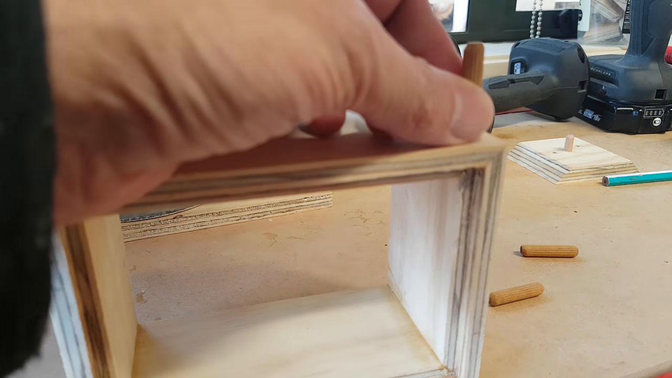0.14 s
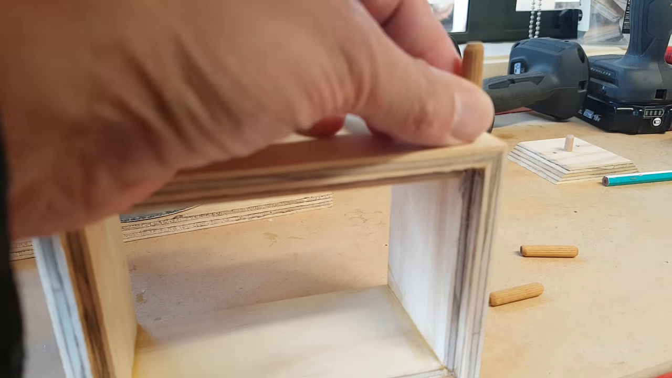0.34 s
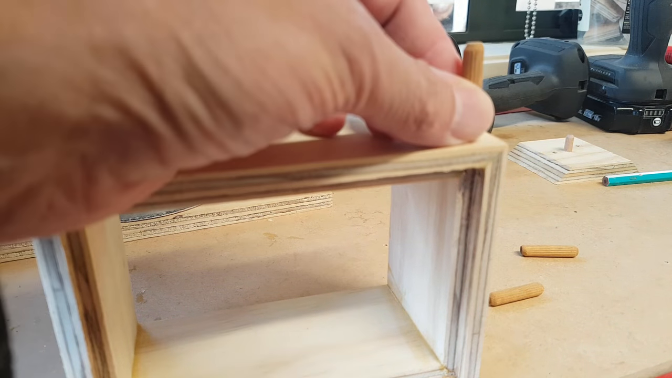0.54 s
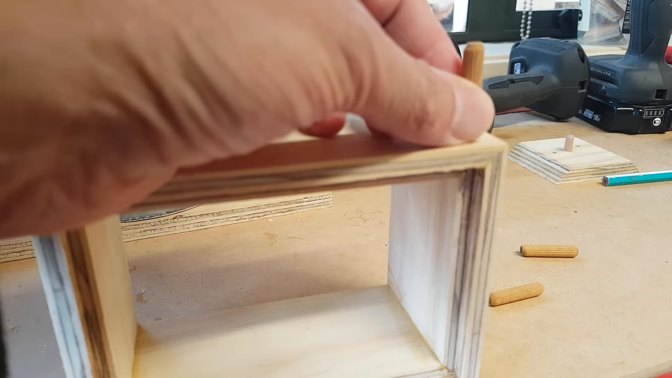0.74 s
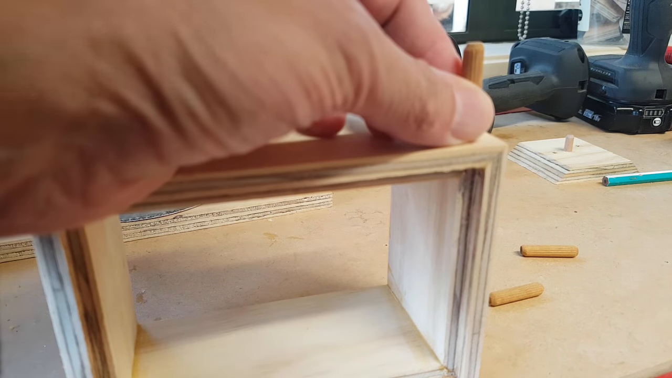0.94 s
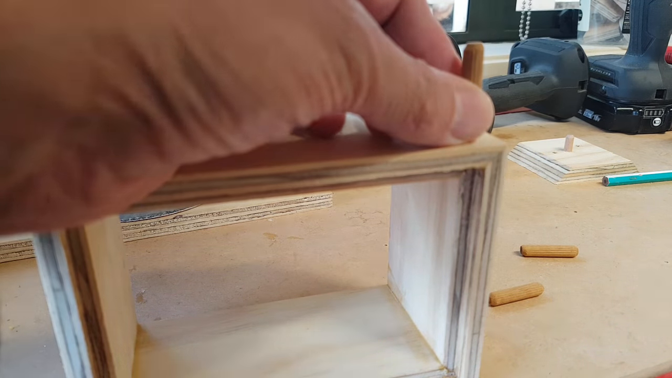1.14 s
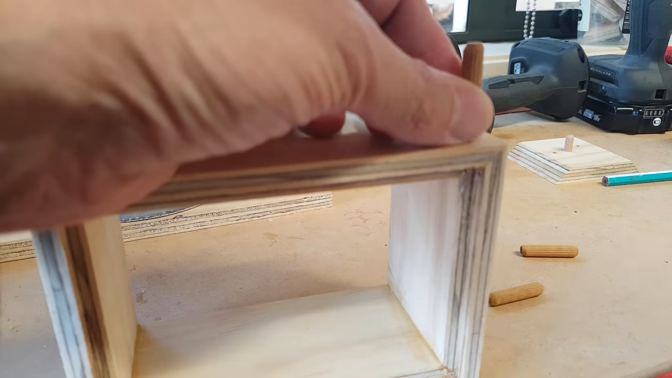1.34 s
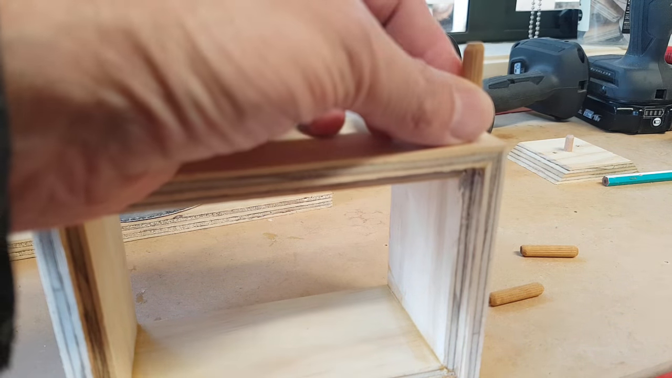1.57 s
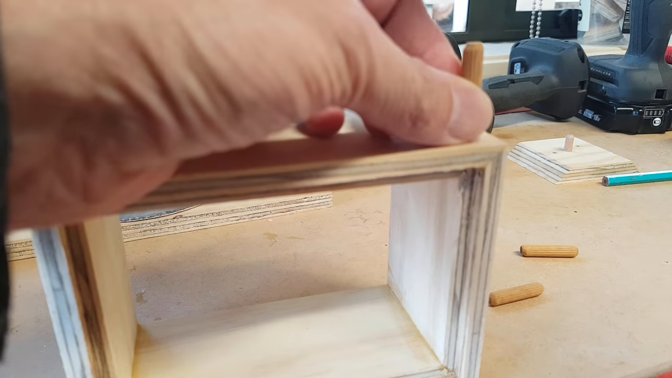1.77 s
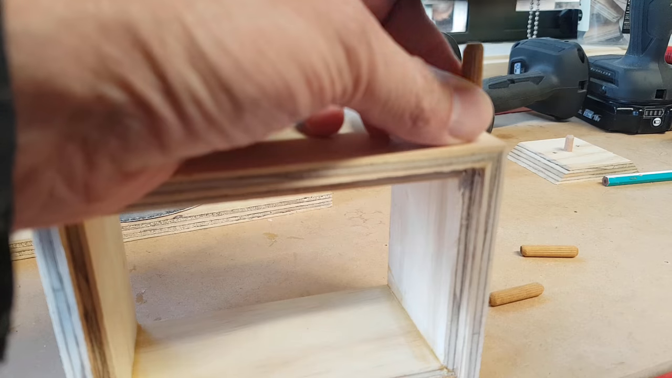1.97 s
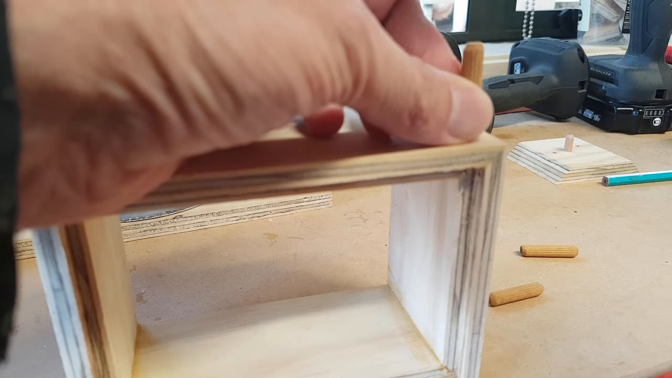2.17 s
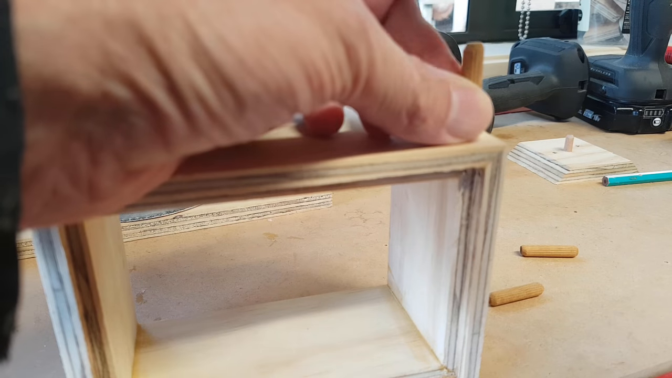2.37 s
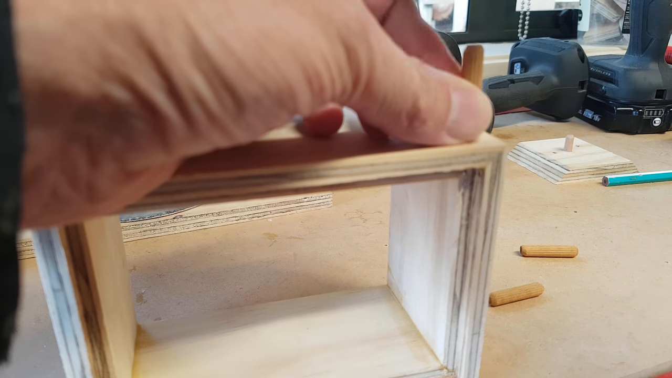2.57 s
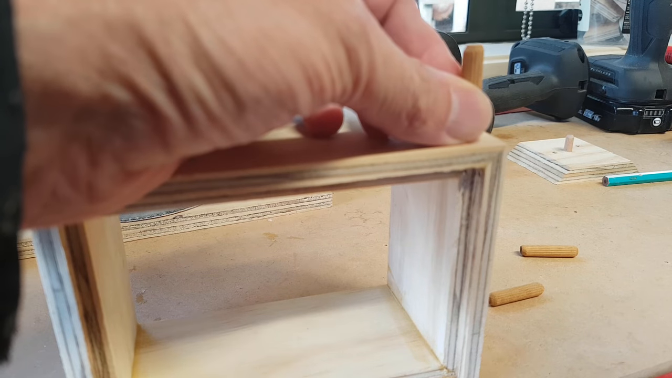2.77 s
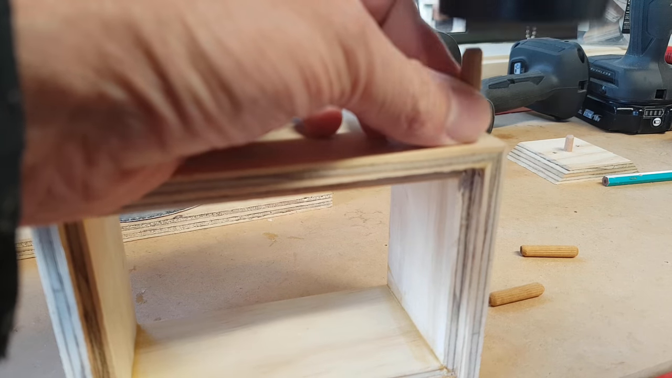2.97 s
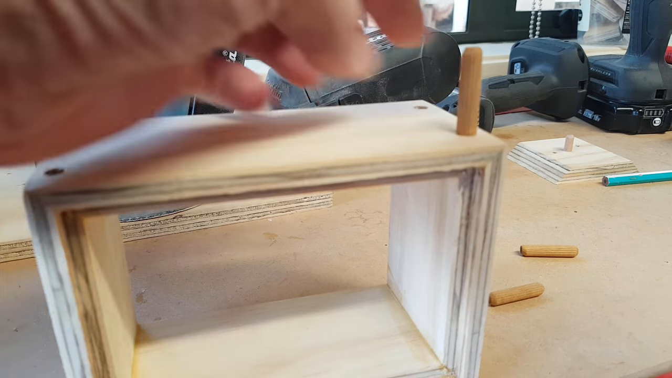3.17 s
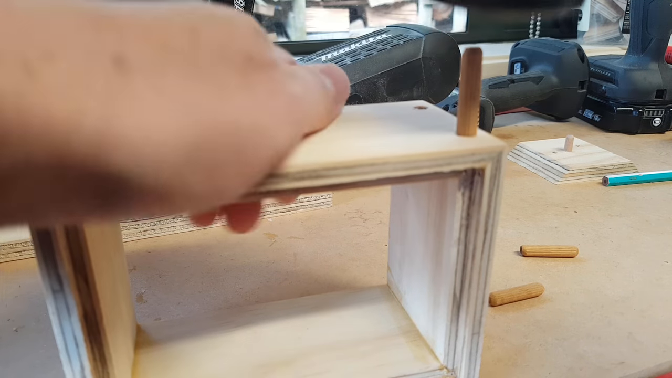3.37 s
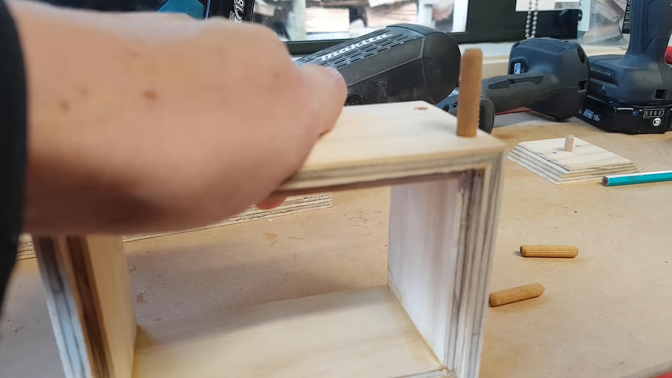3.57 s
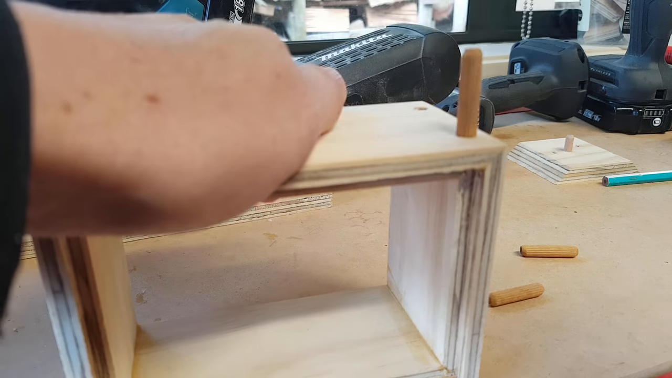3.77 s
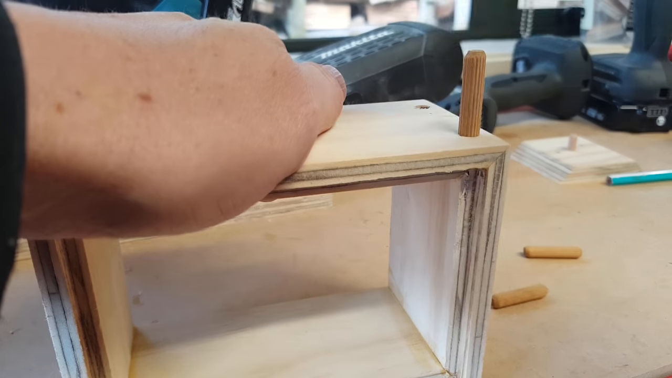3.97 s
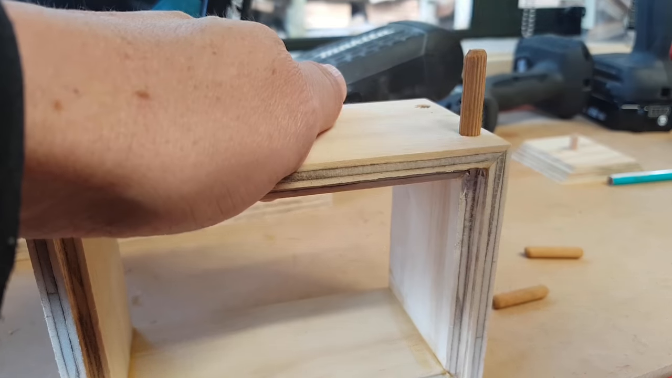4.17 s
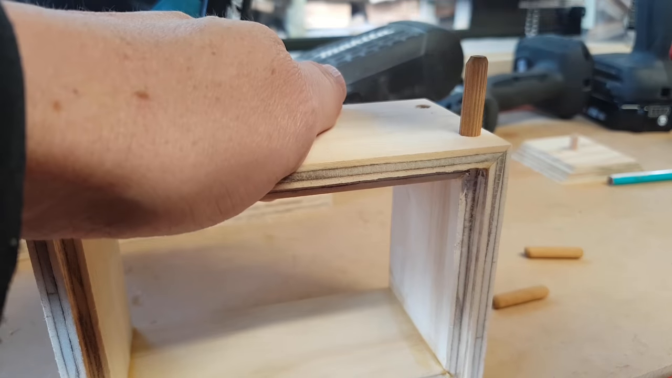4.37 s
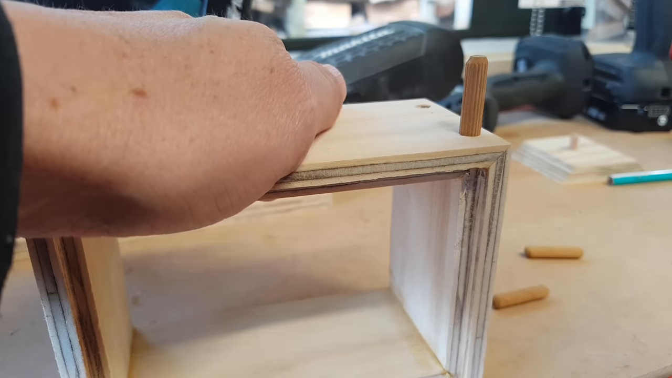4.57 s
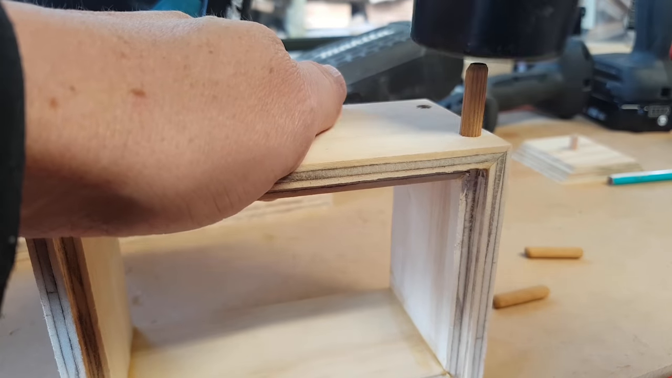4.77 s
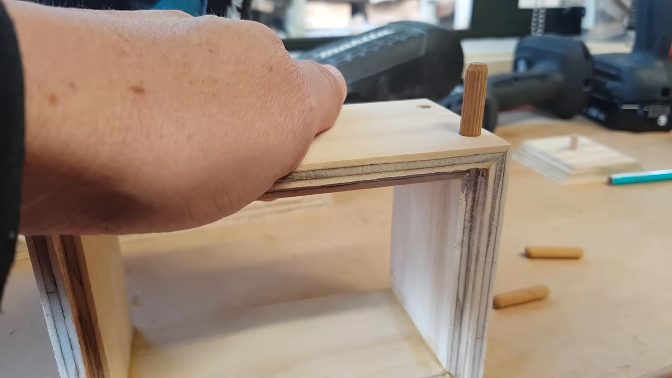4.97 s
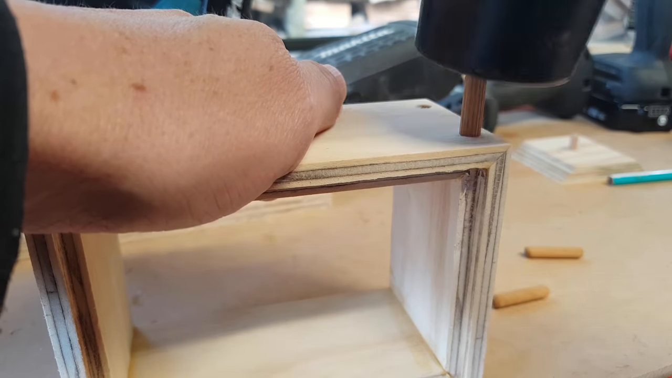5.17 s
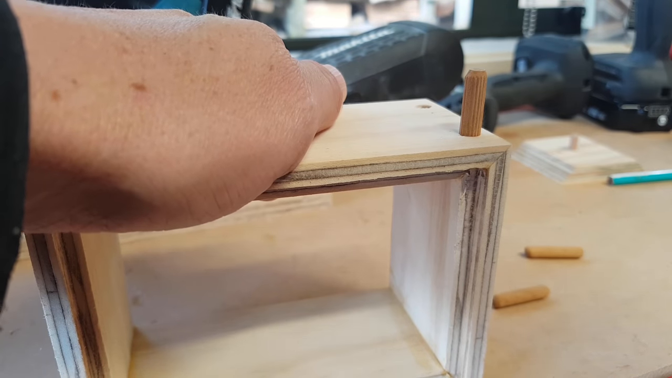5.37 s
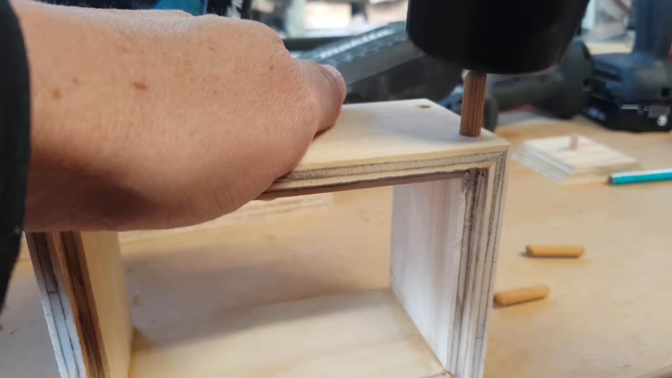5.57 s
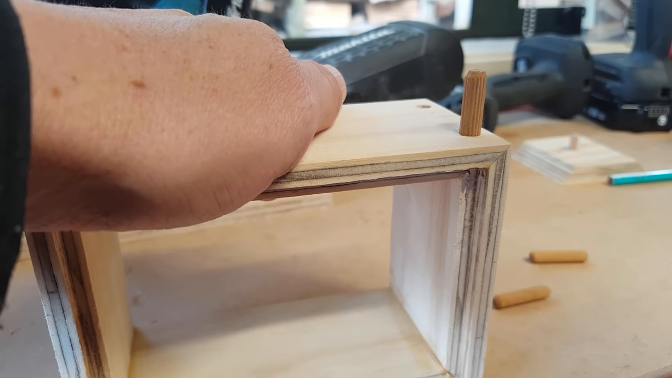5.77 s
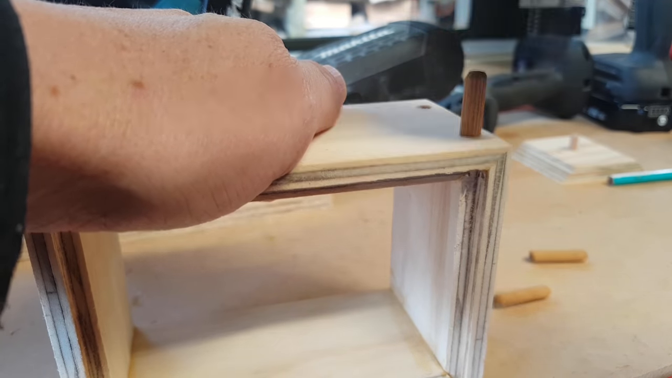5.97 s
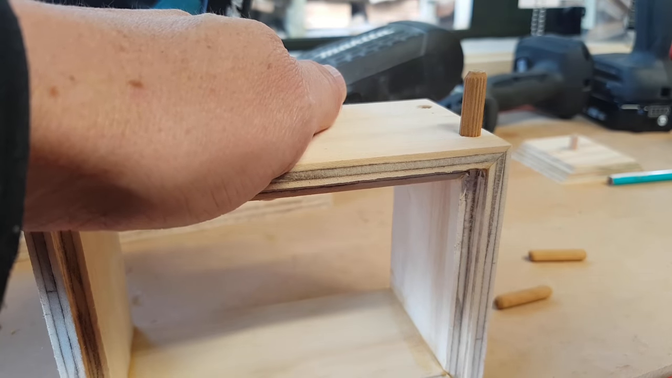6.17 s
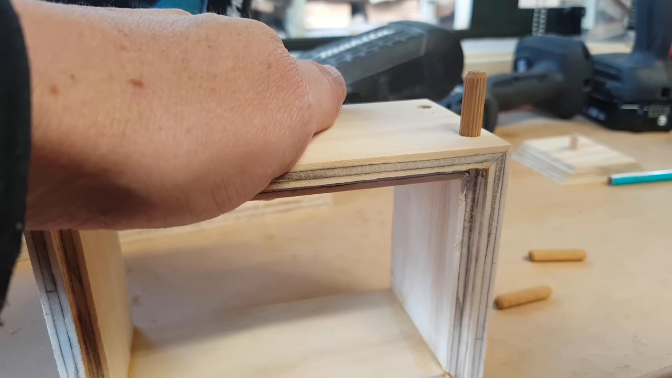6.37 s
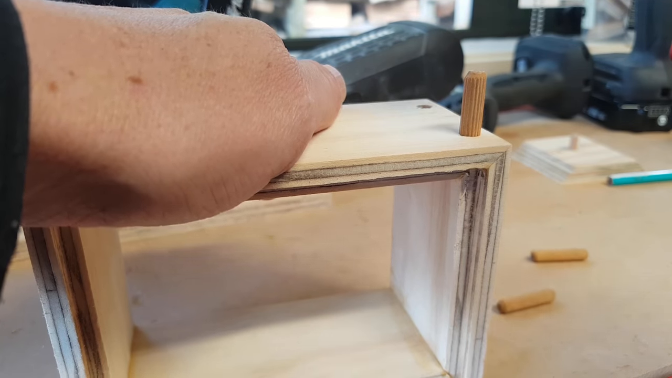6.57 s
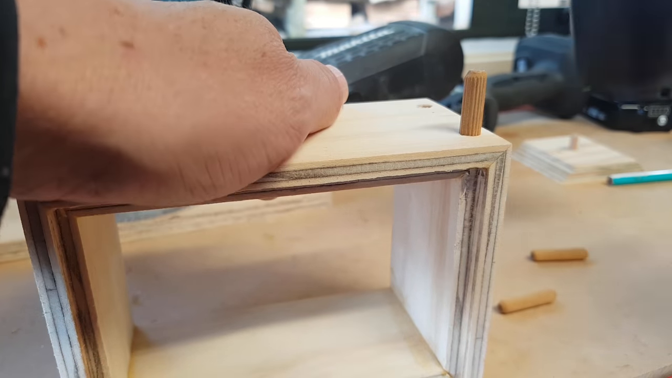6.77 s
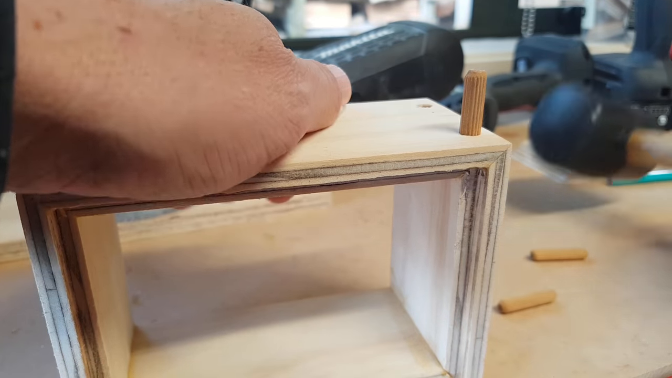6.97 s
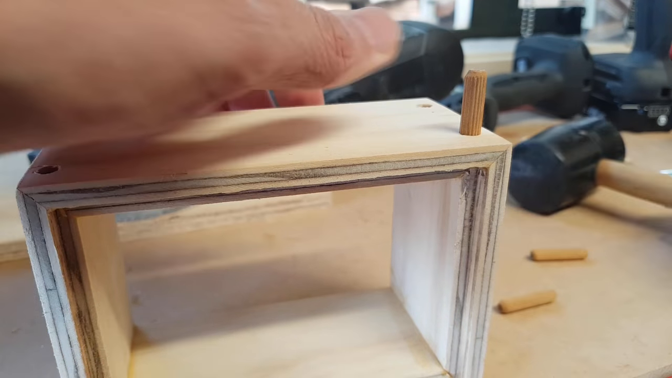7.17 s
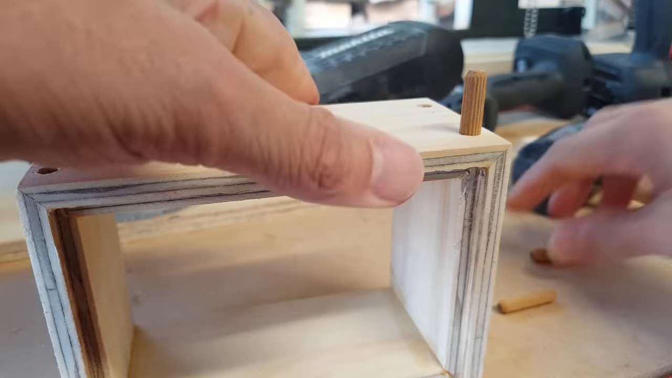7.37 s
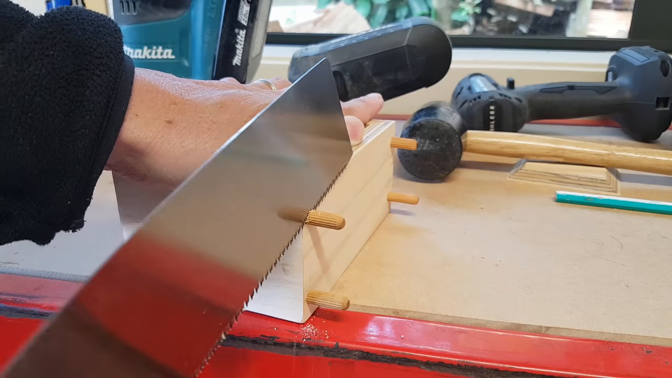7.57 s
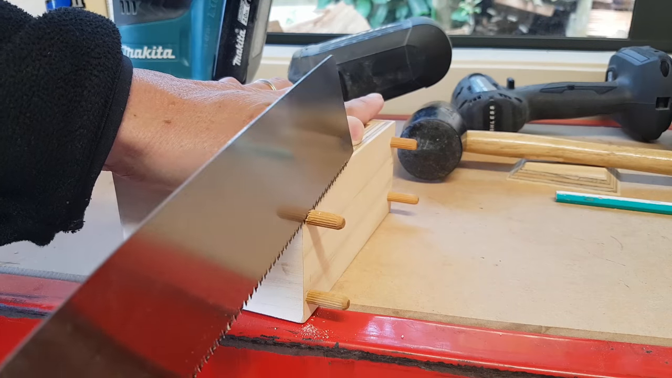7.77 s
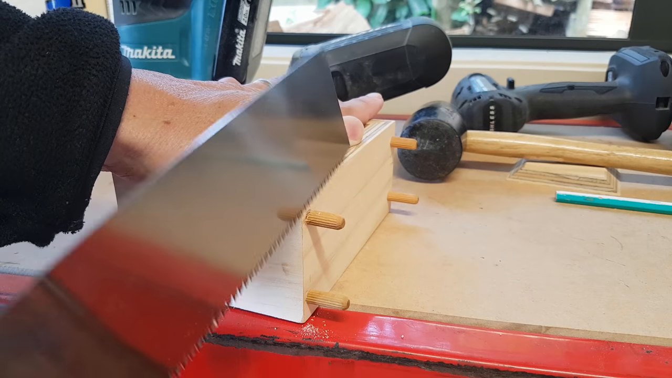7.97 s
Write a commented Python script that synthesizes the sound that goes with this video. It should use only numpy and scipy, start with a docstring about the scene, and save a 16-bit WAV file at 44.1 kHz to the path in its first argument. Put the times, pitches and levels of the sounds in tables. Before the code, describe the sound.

A close stereo view of a small workshop with soft room noise and a low hum. For the first two seconds it is almost silent: an arm settles, fingers tick, a dowel rubs in its hole around 0.9, then ticks ever faster and duller until about 2, with a faint thin whistle rising and sinking near 1.1 and a dry scuff at 1.3. Loud mallet blows land at 2.46 and 2.89, chattering and choked by the fingers. After a soft touch at 3.46, seven hard hollow knocks follow from 3.86 to 6.43, about 0.43 apart, brighter as the dowel tightens, with box rebounds and jingling steel; a faint high note lingers from 5.6. The rubber head thuds down at 7.07, rocking slightly, and the handle clacks at 7.26. A short grainy saw rasp comes at 7.47, then light scuffs at 7.8 and 8.

```python
"""A wooden dowel is twisted into a plywood box on a workbench: filtered noise rubs, then ticks ever sooner, and
a thin gliding sine whistles. A dry scuff of noise follows, then mallet blows drive the dowel home: each cracks
as a noise burst, thumps through decaying box and bench modes with dense echoes, and chimes metal tools.
The mallet is laid down, head first, then handle. A hand saw starts on the dowels, as random impulses through
resonances, and light scuffs follow. Soft room noise and a low hum of sines lie beneath it all."""
import sys
import numpy as np
from scipy import signal
from scipy.fft import rfft, irfft, next_fast_len
from scipy.io import wavfile
from scipy.ndimage import uniform_filter1d

SR = 44100
rng = np.random.default_rng(int(sys.argv[2]) if len(sys.argv) > 2 else 0)


def to_wav(s):
    """Save 16-bit WAV."""
    ch = np.atleast_2d(s).T  # columns
    pcm = np.round(np.clip(ch, -1, 1) * 32767)  # PCM
    wavfile.write(sys.argv[1], SR, pcm.astype(np.int16))


N = 354123
TIME = np.arange(N) / SR
HIT_TIME = TIME[:SR * 3 // 5]   # the span of one knock and its echoes

# mallet contacts: start_s, level_db, hardness_db_per_octave,
# then relative to the level: dowel_ring_db, crack_db, bounce_db, chime_db
CONTACTS = [(2.4572, -23, -2, 12, 6, -20, -16), (2.4648, -2.5, -2.5, -8, -3, -15, -2),
            (2.8881, -3.3, -1.9, 14, -2, -2, -2), (3.464, -27.5, -5.2, -4, 1, -17, -23),
            (3.8574, 1.2, -1, 2.5, 2.8, -11, -8), (4.2991, 1.7, 0, -1.5, -1, -4, -6),
            (4.732, -13, 1, -6, -3, -15, -26), (4.7402, 3.1, .5, -8, -9, -7, -11),
            (5.1628, 3.8, .7, 1, 1, -4, -14), (5.5895, 3, .9, 1, 0, -9, 0),
            (6.0070, 1.8, .9, 1, 0, -11, 7.5), (6.4295, 2.3, 1.2, 2, .5, -12, 2.5)]
# faint after-ring of the bench and what lies on it, for a contact at 0 dB: pitch_hz, level_db, t60_s
BENCH_RING = [(280, -52.5, 1.2), (366, -68, 2.5), (818, -70, 5.4), (855, -60, 1.6), (1892, -69, 1.3),
              (3020, -76, 1), (3770, -76.5, 1.2), (4330, -76.5, 0.86)]
# spectrum of the blow's echoes: frequency_hz, relative_level_db
ECHO_SPECTRUM = [(28, -50.5), (52, -32.5), (75, -15), (150, -18), (230, -3.5), (450, 4.5), (700, 1.5),
                 (1100, -4.5), (2000, -6), (3000, -11.5), (4500, -19.5), (7500, -37.5), (11000, -35.5),
                 (16000, -37.5)]
# until the fingers let go the dowel is loose and chatters after a blow
LET_GO_S, CHATTER_GAP_S = 3.2, .0112
# loss per rebound; the crack, relative to the first rebound, is spared this loss
CHATTER_LOSS_DB, CHATTER_CRACK_DB = 3, 3
# afterwards the box hops, longer as the dowel tightens: flight at the letting go, growth in s per s
HOP_FLIGHT_S, HOP_GROWTH = .036, .006


def mallet(decay, room_db=-15.0, change=.7, first_touch_s=0.0018, squeeze_db=-19, loose=2.8, count=2):
    """Repeated impact: blows harden as the dowel seats; a loose dowel chatters, a tight one makes the box hop."""
    out = np.zeros((2, N))
    usual, *others = [reflections(short_noise(), ECHO_SPECTRUM, decay, build_s=.0025) for _ in range(5)]

    def echoes():
        """Partial coherence: the box shifts between contacts, so its echoes are only partly the same."""
        weights = rms_one(rng.standard_normal(len(others)))
        shift = np.tensordot(weights, others, axes=1) / np.sqrt(len(others))
        return from_db(room_db) * (usual + change * shift) / np.hypot(1, change)

    for s, db, hardness, dowel_db, crack_db, bounce_db, chime_db in CONTACTS:
        held = s < LET_GO_S
        add(out, s, from_db(db) * knock(echoes(), hardness, dowel_db, crack_db, held))
        # the rubber head squeezes against the dowel just before it gives way
        add(out, s - first_touch_s, from_db(db + squeeze_db) * ring(DOWEL_MODES, .05, swell_s=.002))
        # loose things on the bench answer only to the hard blows: several dB per dB of blow
        add(out, s, from_db(loose * db) * ring(BENCH_RING, 0.87, swell_s=.01))
        add(out, s, chime(db + chime_db))
        if held:
            for k in range(count):
                loss_db = k * CHATTER_LOSS_DB
                rebound = knock(echoes(), hardness, 0, CHATTER_CRACK_DB + loss_db, held)
                add(out, s + (k + 1) * CHATTER_GAP_S, from_db(db + bounce_db - loss_db) * rebound)
        else:
            flight_s = HOP_FLIGHT_S + HOP_GROWTH * (s - LET_GO_S)
            add(out, s + flight_s, from_db(db + bounce_db) * hop(decay))
    return out


# dowel and box lid under the mallet: pitch_hz, relative_level_db, t60_s
DOWEL_MODES = [(456, -18, 0.01), (836, -15, 0.035), (1204, -7.5, 0.021), (1570, -4, 0.012),
               (1940, -9.5, 0.018), (2648, -7, 0.011), (3950, -5.5, 0.0061)]
# box on the bench: pitch_hz, relative_level_db, t60_s
BOX_MODES = [(84.2, -39.5, 0.3), (105.7, -37, 0.19), (139, -42.5, 0.42), (226.5, -13, 0.17),
             (276.3, -20.5, .25), (303, -24, 0.18), (309.5, -25.5, .25), (340.5, -20.5, .24),
             (402.2, -20, 0.21), (460, -19.5, .22), (543, -24.5, 0.3), (761, -22.5, .22), (1057, -27, 0.29),
             (1167, -28, 0.33), (1361, -20.5, 0.14), (1535, -24.5, 0.12), (1830, -25.5, 0.23),
             (2150, -35, 0.073), (2043, -27.5, .22), (2380, -30, .22), (2475, -34, 0.073),
             (2770, -29, 0.11)]
# the fingers choke the dowel's upper ring: frequency_hz, gain_db
FINGER_CHOKE = [(600, -2), (1100, -3), (1900, 1), (2700, -8), (3900, -12), (6000, 3), (11000, -1)]
HAND_DAMPING_DB_PER_S = 28   # the held box dies sooner
# hardness tilts the contact about the pivot, between the two edges
SOFT_EDGE_HZ, PIVOT_HZ, HARD_EDGE_HZ = 140, 800, 4500
# a softer, longer push rocks the box more: dB per unit of hardness
BOX_DB_PER_HARDNESS = -.9


def knock(echoes, hardness, dowel_db, crack_db, held):
    """Modal excitation: crack, dowel, box and room take the contact's spectrum; hard is bright, held is choked."""
    snap = np.zeros_like(echoes)
    add(snap, 0, from_db(dowel_db) * ring(DOWEL_MODES, .05, swell_s=0.00098))
    add(snap, 0, -from_db(crack_db) * crack())
    body = echoes.copy()
    add(body, 0, from_db(BOX_DB_PER_HARDNESS * hardness) * ring(BOX_MODES, 0.44, swell_s=0.0079))
    if held:
        snap = signal.fftconvolve(snap, pulse(FINGER_CHOKE), axes=1)[:, :len(HIT_TIME)]
        body *= from_db(-HAND_DAMPING_DB_PER_S * HIT_TIME)
    tilt = [(hz, hardness * np.log2(hz / PIVOT_HZ)) for hz in (SOFT_EDGE_HZ, HARD_EDGE_HZ)]
    return signal.fftconvolve(snap + body, pulse(tilt), axes=1)


# spectrum of the crack: frequency_hz, gain_db
CRACK_SPECTRUM = [(30, -37.5), (80, -13.5), (250, -2.5), (600, -3.5), (1500, -0.5), (2500, -7), (4200, -7),
                  (6000, -16.5), (8000, -27), (11000, -22), (16000, -28.5)]


def crack(crack_db=16, slip_s=.0011, pan_db=3.0):
    """Stick-slip: the dowel jerks into its hole with a first snap and tiny slips within a few milliseconds."""
    t = TIME[:400]
    slips = rng.standard_normal((2, len(t))) * t * np.exp(-t / (slip_s / 2))
    slips /= np.sqrt(np.sum(slips ** 2, axis=1, keepdims=True))
    slips[:, 0] += .6   # the first snap
    snap = signal.fftconvolve(slips, pulse(CRACK_SPECTRUM), axes=1)
    return snap * from_db(crack_db + np.array([[pan_db], [-pan_db]]))


# filter on the box's fall: frequency_hz, gain_db
HOP_SPECTRUM = [(60, -9.5), (150, -7.5), (300, 2), (650, 4), (1100, -8), (2500, -14), (6000, -21),
                (15000, -27)]


def hop(decay, echo_db=-16):
    """Secondary impact: the box drops back on the bench with a dull knock of its own modes."""
    body = from_db(echo_db) * reflections(short_noise(), ECHO_SPECTRUM, decay, build_s=.001)
    add(body, 0, ring(BOX_MODES, .35, swell_s=.002))
    return signal.fftconvolve(body * np.exp(-HIT_TIME / .04), pulse(HOP_SPECTRUM), axes=1)


# small steel tools, before each jolt's level: pitch_hz, level_db, t60_s
TOOL_MODES = [(3343, -43, .24), (3784, -46, .22), (4247, -62, .6), (7150, -54, .2), (7364, -55, 0.3),
              (9028, -56.5, .35), (9720, -56, .28), (11550, -62, 0.22), (12600, -62, .22),
              (13630, -62, .26)]
# their loudest mode is split in two and beats: pitch_hz, level_db, t60_s
BEATING_PAIR = [(6067, -41, .36), (6104, -46.5, .32)]


def chime(db, uneven_db=2.0):
    """Modal superposition and beating: each jolt sets the steel modes going in a different mix."""
    modes = np.array(TOOL_MODES + BEATING_PAIR, float)
    modes[:, 1] += db + uneven_db * rng.standard_normal(len(modes))
    return ring(modes, .45, swell_s=.005)


# one long steel note: pitch_hz, level_db, t60_s
STEEL_NOTE = [(2250, -58, 14)]
STEEL_START_S = 5.588


def steel_note(stop_s=7.33):
    """Light damping: a steel tool, shaken by a hard blow, sings until the mallet is put down."""
    out = np.zeros((2, N))
    add(out, STEEL_START_S, ring(STEEL_NOTE, 2.5, swell_s=0.026))
    return out * np.clip((stop_s - TIME) / 0.15, 0, 1)


# the mallet head laid on the bench and its small rebound: start_s, level_db, chime_level_db
LANDINGS = [(7.0677, 2.5, -5), (7.0900, -4, -23), (7.177, -20, -27)]
# bench top under the rubber head: pitch_hz, relative_level_db, t60_s
BENCH_MODES = [(289.3, -33, 0.42), (321.3, -30, 0.35), (406.6, -21.5, .2), (500, -28.5, 0.35),
               (711, -34, 0.34), (1203, -35, 0.14), (1448, -32, .17)]
# spectrum of the thud: frequency_hz, relative_level_db
THUD_SPECTRUM = [(60, -30.5), (150, -22), (260, 8.5), (420, 5), (800, 0), (1300, -10.5), (2000, -17.5),
                 (3500, -28.5), (6000, -44.5), (15000, -71)]


def landing(decay, thud_db=-25, push_db=11):
    """Soft contact: the rubber head meets the bench with a dull thud and rocks once or twice."""
    out = np.zeros((2, N))
    for s, db, chime_db in LANDINGS:
        add(out, s, from_db(db + push_db) * pulse(THUD_SPECTRUM))
        add(out, s, from_db(db) * ring(BENCH_MODES, .35, swell_s=0.0018))
        add(out, s, from_db(db + thud_db) * reflections(short_noise(), THUD_SPECTRUM, decay, build_s=0.00039))
        add(out, s, chime(chime_db))
    return out


# mallet handle dropped on the bench: pitch_hz, level_db, t60_s
HANDLE_MODES = [(820, -31, 0.36), (1132, -28, 0.44), (1330, -27, 0.069), (2080, -28, 0.34),
                (2690, -23, 0.053), (3020, -43, 0.7)]
HANDLE_START_S = 7.2605
# spectrum of its clack: frequency_hz, relative_level_db
HANDLE_SPECTRUM = [(100, -65), (230, -6.5), (400, -2), (550, -8.5), (1100, -4.5), (1700, -5), (2700, -5.5),
                   (3700, -27), (4900, -18.5), (7000, -34.5), (11000, -39), (16000, -47)]


def handle(clack_db=-23.5):
    """Hard contact: the handle drops after the head with a light, bright clack and shivers briefly."""
    out, decay = np.zeros((2, N)), room_decay(hold_s=0.015, late_db=-3.5, late_t60=0.38)
    add(out, HANDLE_START_S, ring(HANDLE_MODES, 0.43, swell_s=0.002))
    clack = reflections(short_noise(), HANDLE_SPECTRUM, decay, build_s=0.00017)
    add(out, HANDLE_START_S, from_db(clack_db) * clack)
    return out


# saw stroke: full_s, level_db, attack_s, hold_s, release_s
STROKE = (7.465, -30, .006, .155, .2)
STROKE_SAG_DB_PER_S = 55   # it weakens as the blade slows
# spectrum of the torn fibres: frequency_hz, relative_level_db
SAW_SPECTRUM = [(30, -30), (70, -13), (140, -10), (220, 1), (450, -9.5), (650, -4), (1200, -11),
                (2000, -15.5), (3000, -25.5), (4600, -24.5), (5500, -31), (7500, -38), (10000, -29.5),
                (16000, -29)]
# box as the saw shakes it: pitch_hz, width_hz, relative_level_db
SAWN_BOX_MODES = [(197, 9.9, 8.5), (226, 9.8, 5.5), (340, 12, 7), (420, 8.3, 3), (618, 8.3, 9),
                  (672, 8.3, 4.5), (775, 12, -8), (1113, 21, -5)]
# the saw blade's thin ringing bands: pitch_hz, width_hz, relative_level_db
BLADE_MODES = [(3210, 43, 0), (4450, 82, -5), (6280, 79, -12), (10500, 37, -10), (12300, 130, -11),
               (14900, 110, -9)]


def saw(teeth_per_s=600, rasp=0.1, box_db=-4, fibre_db=-2.5, blade_db=-21, snag_db=1.3):
    """Random impulse excitation: teeth shake box and blade over rasping fibres; the blade snags and frees itself."""
    caught = rng.random(N) < teeth_per_s / SR
    catches = caught * rng.choice([-1, 1], (2, N)) * rng.uniform(0.4, 1, N)
    snags = from_db(snag_db * rms_one(uniform_filter1d(rng.standard_normal(N), size=200)))
    cutting = (catches + rasp * rng.standard_normal((2, N))) * snags
    effort = swell(*STROKE) * from_db(-STROKE_SAG_DB_PER_S * np.maximum(TIME - STROKE[0], 0))
    box = from_db(box_db) * resonate(cutting[0], SAWN_BOX_MODES)
    blade = from_db(blade_db) * resonate(cutting, BLADE_MODES)
    return effort * (from_db(fibre_db) * coloured(cutting, SAW_SPECTRUM) + box + blade)


# light dry scuffs across the wood: peak_s, peak_level_db
SCUFFS = [(1.33, -57), (7.824, -48), (8.03, -49)]
SCUFF_ATTACK_S, SCUFF_RELEASE_S = .16, .12
# their spectrum: frequency_hz, relative_level_db
SCUFF_SPECTRUM = [(88, -27.5), (150, 0), (960, -5), (1120, -4.5), (2140, -11), (2450, -22), (3220, -15),
                  (7320, -27), (16000, -15.5)]


def sliding():
    """Friction noise: dry, airy scuffs across the wood, each swelling and fading alike."""
    gain = sum(swell(s, db, SCUFF_ATTACK_S, 0, SCUFF_RELEASE_S) for s, db in SCUFFS)
    return gain * coloured(rng.standard_normal((2, N)), SCUFF_SPECTRUM)


# the arm settles and nudges the bench: full_s, level_db, attack_s, hold_s, release_s
SETTLE = (.07, -56, .8, .02, 1.7)
# spectrum of the settling: frequency_hz, relative_level_db
GRIP_SPECTRUM = [(30, -14), (60, 1), (120, -1), (180, -9), (400, -22), (1500, -38.5)]
# the dowel rubs round in its hole: full_s, level_db, attack_s, hold_s, release_s
TURN = (.86, -54.5, .06, .04, .2)
# spectrum of the rubbing: frequency_hz, relative_level_db
RUB_SPECTRUM = [(120, -6), (250, 6), (450, 3), (900, -3), (1500, -23), (4000, -44)]
# the fingers shift their grip with small dry ticks: start_s, level_db, brightness_db_per_octave
FINGER_TICKS = [(.54, -60, 4), (.666, -52.5, 1), (.838, -55, 1), (3.368, -60.5, 3)]
# the dowel slips in a quickening run: each gap is a share of the one before
SLIP_START_S, SLIP_GAP_S, SLIP_QUICKENING = .948, .143, .935
# first slip and loss per slip: level in dB, brightness in dB per octave
SLIP_DB, SLIP_FADE_DB, SLIP_BRIGHTNESS, SLIP_DULLING = -51, .55, -2, .35


def twisting(count=11):
    """Stick-slip friction: arm settles, fingers grip; the dowel rubs, then slips ever sooner, softer and duller."""
    out = swell(*SETTLE) * coloured(rng.standard_normal((2, N)), GRIP_SPECTRUM)
    out += swell(*TURN) * coloured(rng.standard_normal((2, N)), RUB_SPECTRUM)
    for s, db, brightness in FINGER_TICKS:
        add(out, s, tick(db, brightness))
    s = SLIP_START_S
    for k in range(count):
        add(out, s, tick(SLIP_DB - k * SLIP_FADE_DB, SLIP_BRIGHTNESS - k * SLIP_DULLING))
        s += SLIP_GAP_S * SLIP_QUICKENING ** k
    return out


# spectrum of a tick before its brightness tilt: frequency_hz, relative_level_db
TICK_SPECTRUM = [(150, -51), (400, 3.5), (1100, 2.5), (2000, -2.5), (3000, -11), (4500, -22), (8000, -28)]
TICK_DECAY_S = .015   # time constant


def tick(db, brightness):
    """Heavy damping: a soft wooden tick that dies at once."""
    t = TIME[:SR // 8]
    spectrum = [(hz, band_db + brightness * np.log2(hz)) for hz, band_db in TICK_SPECTRUM]
    envelope = np.exp(-t / TICK_DECAY_S) * (1 - np.exp(-t / .001))
    return from_db(db) * coloured(rng.standard_normal((2, len(t))), spectrum) * envelope


# a faint thin whistle: full_s, level_db, attack_s, hold_s, release_s
WHISTLE = (.995, -64, .15, .3, .25)
# its pitch leaps from rest towards one top and sinks back; the sinking time is a time constant
WHISTLE_REST_HZ, WHISTLE_TOP_HZ = 3750, 8700
WHISTLE_TOP_S, WHISTLE_CLIMB_S, WHISTLE_SINK_S = 1.118, .143, .068


def whistle(waver=0.0206, leap=.55):
    """Frequency modulation: a faint, thin, unsteady tone leaps up, rounds its top and sinks."""
    climb = np.clip(1 + (TIME - WHISTLE_TOP_S) / WHISTLE_CLIMB_S, 0, 1) ** leap
    sink = np.exp(-np.maximum(TIME - WHISTLE_TOP_S, 0) / WHISTLE_SINK_S)
    rounded = uniform_filter1d(climb * sink, size=900)
    glide_hz = WHISTLE_REST_HZ + (WHISTLE_TOP_HZ - WHISTLE_REST_HZ) * rounded
    wobble = rms_one(uniform_filter1d(rng.standard_normal((2, N)), size=60))
    cycles = np.cumsum(glide_hz * (1 + waver * wobble), axis=1) / SR
    return swell(*WHISTLE) * np.sin(2 * np.pi * cycles)


# level of the room noise: time_s, level_db
BACKGROUND_LEVEL = [(0, -63.5), (2.3, -62), (3.3, -69.5), (3.8, -65), (6.9, -74), (7.5, -68), (8.03, -62)]
# its spectrum: frequency_hz, relative_level_db
HUSH_SPECTRUM = [(25, -14), (40, -9), (62, -4), (90, -7), (125, -13), (160, -13), (230, -7), (450, -4.5),
                 (850, -11.5), (1300, -14), (2500, -19.5), (5400, -30.5), (9000, -34), (15000, -28)]
# low hum, before it follows the noise's level: pitch_hz, level_db
HUM = [(61, -76), (125, -75)]


def background():
    """Stationary noise and tones under one envelope: soft room noise with a low hum that follows its level."""
    gain = from_db(np.interp(TIME, *np.transpose(BACKGROUND_LEVEL)))
    hum = sum(from_db(db) * np.sin(2 * np.pi * (hz * TIME + rng.random())) for hz, db in HUM)
    return gain * coloured(rng.standard_normal((2, N)), HUSH_SPECTRUM) + rms_one(gain) * hum


# decay of the workshop: frequency_hz, t60_s
ROOM_T60 = [(70, 0.46), (250, 0.3314), (500, 0.0344), (1200, 0.3276), (4000, 0.1759), (8000, 0.22),
            (15000, 0.156)]
# share of the late tail: frequency_hz, relative_level_db
LATE_SHARE = [(62, -14.5), (250, -5), (1000, 7), (2000, -2), (8000, -3.5)]


def room_decay(hold_s, late_db, late_t60):
    """Two-slope reverberation by octave: echoes hold briefly, die, and leave a faint late tail."""
    centres = np.geomspace(62, 16000, 9)
    age = np.hypot(HIT_TIME, hold_s) - hold_s
    late = from_db(late_db + at_hz(LATE_SHARE, centres)[:, None] - 60 * HIT_TIME / late_t60)
    early = [from_db(-60 * age / at_hz(ROOM_T60, c)) for c in centres]
    return centres, np.hypot(early, late)


def reflections(white, spectrum, decay, build_s):
    """Diffuse field: dense echoes of one knock from bench and walls, each octave dying at its own rate."""
    centres, envelopes = decay
    size = next_fast_len(len(HIT_TIME))
    hz = np.arange(size // 2 + 1) * SR / size
    masks = np.array([at_hz(np.c_[centres, one], hz) for one in np.eye(len(centres))])
    bands = irfft(rfft(coloured(white, spectrum), size) * masks[:, None], size)[..., :len(HIT_TIME)]
    return (bands * envelopes[:, None]).sum(0) * (1 - np.exp(-HIT_TIME / build_s))


def short_noise():
    """Uncorrelated sources: two white noises as long as one knock."""
    return rng.standard_normal((2, len(HIT_TIME)))


# stereo width of the workshop: frequency_hz, side_minus_mid_db
WIDTH = [(100, -19), (250, -16), (500, -9.5), (1000, -1), (2000, 1), (4000, -2), (12000, 0.5)]


def coloured(white, spectrum):
    """Spectral shaping: two white signals become a stereo pair with this spectrum and the room's width; rms 1."""
    size = next_fast_len(white.shape[-1])
    hz = np.arange(size // 2 + 1) * SR / size
    mid, side = rfft(white, size)
    width = from_db(at_hz(WIDTH, hz))
    gain = from_db(at_hz(spectrum, hz)) / np.hypot(1, width)
    stereo = gain * np.array([mid + width * side, mid - width * side])
    return rms_one(irfft(stereo, size)[:, :white.shape[-1]])


def ring(modes, seconds, swell_s):
    """Modal decay: decaying sines that build up briefly; the higher ones reach the two ears out of step."""
    t, out = TIME[:int(seconds * SR)], 0
    for hz, db, t60 in modes:
        apart = np.arctan(from_db(at_hz(WIDTH, hz))) * rng.choice([-1, 1]) * np.array([[1], [-1]])
        start = from_db(db) * np.exp(1j * (2 * np.pi * rng.random() + apart))
        step = np.exp((2j * np.pi * hz - np.log(1000) / t60) / SR)
        out = out + (start * np.cumprod(np.full(len(t), step))).real
    fade = np.minimum(1, 5 * (1 - t / t[-1]))   # over the last fifth
    return out * (1 - np.exp(-t / swell_s)) * fade


def resonate(x, modes):
    """Forced resonance: pass a signal through parallel resonances; rms 1."""
    bands = [from_db(db) * signal.lfilter(*signal.iirpeak(hz, hz / width, fs=SR), x) for hz, width, db in modes]
    return rms_one(sum(bands))


def pulse(spectrum, size=2048):
    """Minimum phase: the most compact causal click with this spectrum."""
    hz = np.arange(size // 2 + 1) * SR / size
    cepstrum = irfft(np.log(from_db(at_hz(spectrum, hz))))
    # fold the cepstrum onto positive time
    cepstrum[1:size // 2] *= 2
    cepstrum[size // 2 + 1:] = 0
    return irfft(np.exp(rfft(cepstrum)))[None]


def swell(s, db, attack_s, hold_s, release_s):
    """Exponential envelope: rises 60 dB in the attack, is full from s on, holds, falls 60 dB in the release."""
    away = np.maximum(s - TIME, 0) / attack_s + np.maximum(TIME - s - hold_s, 0) / release_s
    return from_db(db - 60 * np.minimum(away, 4))


def from_db(db):
    """Logarithmic level: decibels to gain."""
    return 10 ** (np.asarray(db) / 20)


def rms_one(x):
    """Effective value: scale to rms 1."""
    return x / np.sqrt(np.mean(x ** 2) + 1e-20)


def at_hz(points, hz):
    """Logarithmic pitch: read a table on a log-frequency axis."""
    f, value = np.transpose(points)
    return np.interp(np.log(np.maximum(hz, 1)), np.log(f), value)


def add(out, s, sound):
    """Linear superposition: mix a sound in at a moment."""
    i = round(s * SR)
    out[:, i:i + sound.shape[-1]] += sound[..., :out.shape[1] - i]


def scene():
    """Superposition of all sources at the bench."""
    decay = room_decay(hold_s=0.027, late_db=-31, late_t60=0.83)
    hammering = mallet(decay) + steel_note()
    return twisting() + whistle() + hammering + landing(decay) + handle() + saw() + sliding() + background()


CUTOFF_HZ = 16300


def record(dry, top=1.4):
    """Saturation and band limiting: the loudest peaks are rounded and the top is cut."""
    rounded = top * np.tanh(dry / top)
    return signal.sosfilt(signal.ellip(10, .1, 80, CUTOFF_HZ, fs=SR, output="sos"), rounded)


dry = scene()
out = record(dry)
to_wav(out)
```